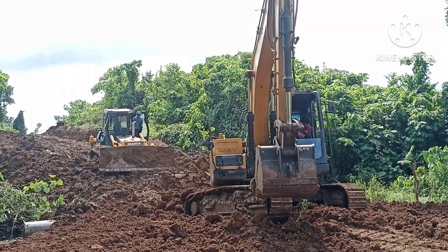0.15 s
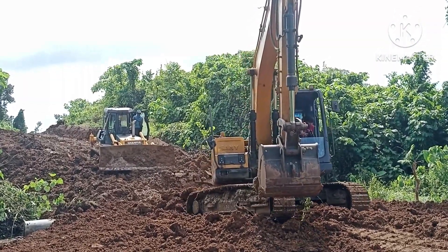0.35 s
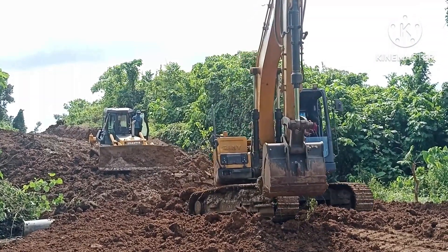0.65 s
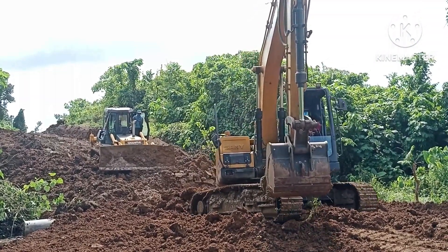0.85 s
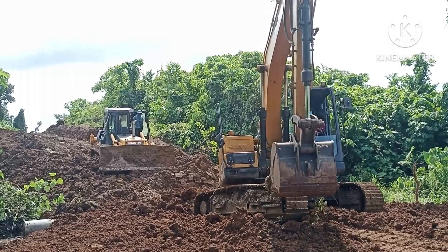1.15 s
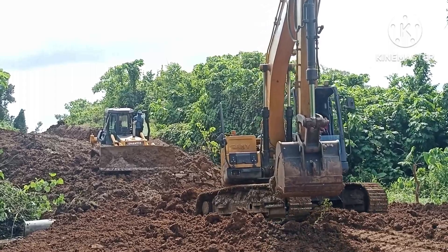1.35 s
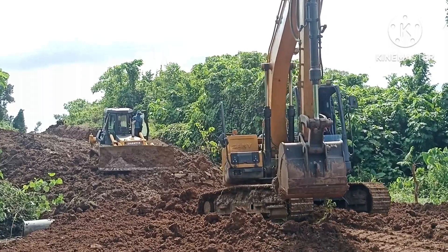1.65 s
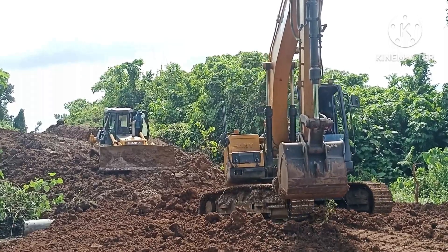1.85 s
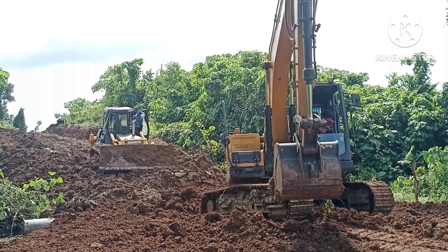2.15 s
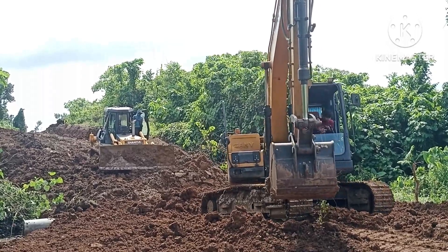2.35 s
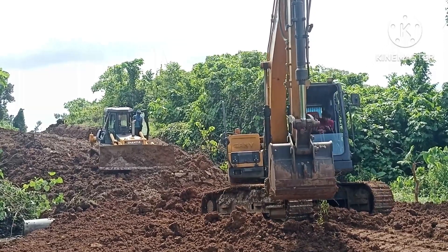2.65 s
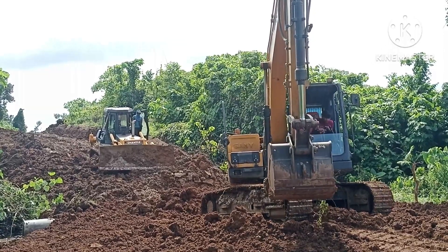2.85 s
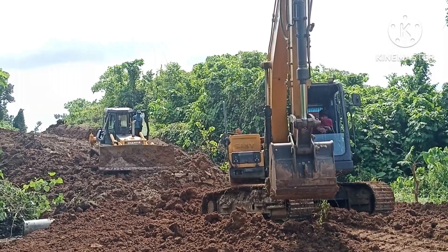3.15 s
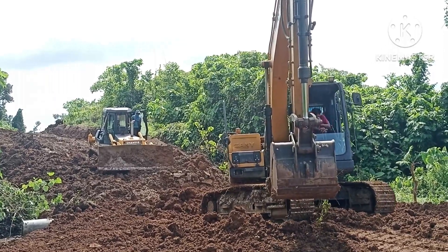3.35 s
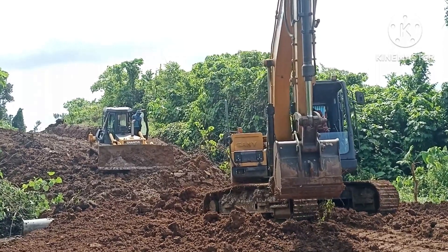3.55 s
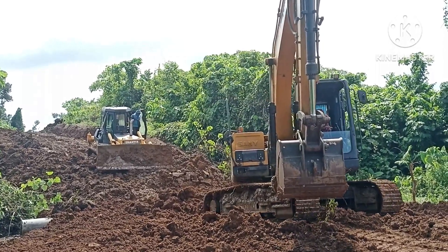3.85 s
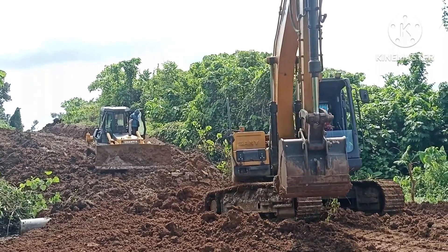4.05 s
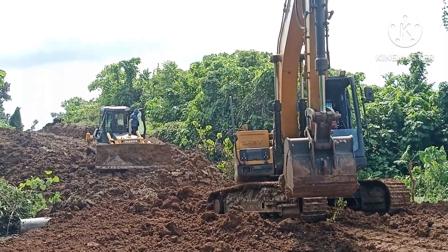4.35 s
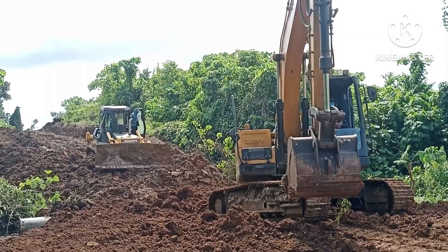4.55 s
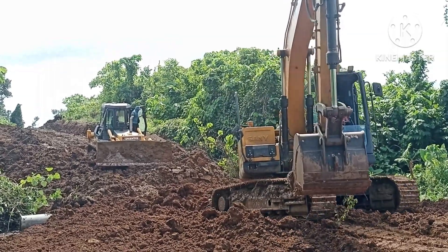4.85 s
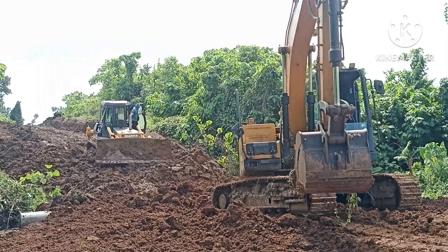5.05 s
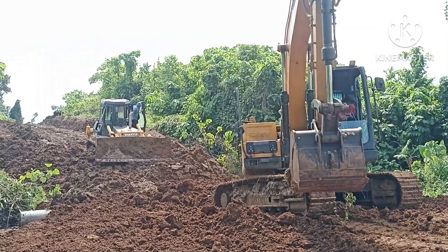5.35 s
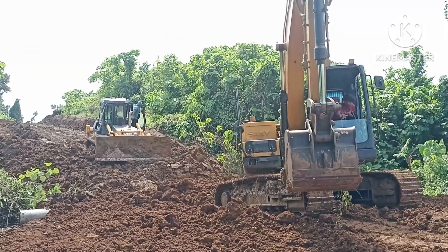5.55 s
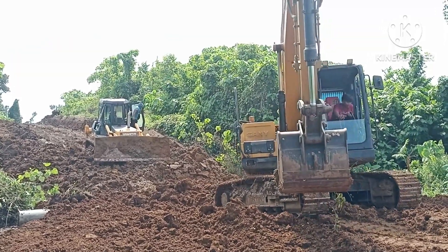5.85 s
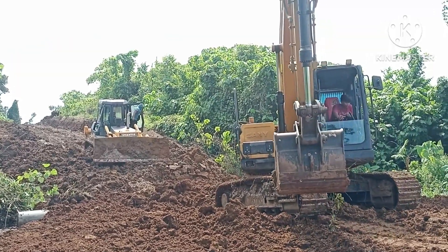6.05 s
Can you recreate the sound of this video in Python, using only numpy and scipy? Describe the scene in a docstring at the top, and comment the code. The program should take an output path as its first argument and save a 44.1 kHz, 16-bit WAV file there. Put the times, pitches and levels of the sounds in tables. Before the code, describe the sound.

Steel excavator tracks clank, slap and rattle in uneven bursts over loose dirt, with brief squeaks and scraping above a low diesel hum outdoors.

```python
"""Open ground with loose dirt: an excavator turns on its steel tracks some way off, trees behind it.
Shoes slap and links clank and rattle: shaped noise bursts with ringing modes; falling tones boom in the frame.
Dry pins squeak, rollers howl and the frame groans on wavering tones; scraping is grit noise with singing modes.
Under it a diesel hums on exhaust lines and travel gears whine; filtered noise gives hydraulic hiss and insects.
Two microphone ports hear it all, with the treble leaning left."""
import sys
import numpy as np
from scipy import signal
from scipy.fft import rfft, irfft, next_fast_len
from scipy.io import wavfile
from scipy.ndimage import uniform_filter1d

SR = 44100
rng = np.random.default_rng(int(sys.argv[2]) if len(sys.argv) > 2 else 0)


def bounce(signal):
    """Save signal as a 16-bit WAV file at the path given by the first command-line argument."""
    frames = np.transpose(np.atleast_2d(signal))
    limited = np.clip(frames, -1, 1)
    pcm = np.round(limited * 32767).astype(np.int16)
    wavfile.write(sys.argv[1], SR, pcm)


N = 272979
TIME = np.arange(N) / SR
SIZE = next_fast_len(N + SR // 2, True)  # padded transform length
FREQ = np.maximum(np.arange(SIZE // 2 + 1) * SR / SIZE, 1)

# Levels in the tables are nominal: each source adds its own gain or random wavering.
# Pins and links knock on the rollers: start_s, struck_pitch_hz, level_db,
# body_relative_db, edge_relative_db, rattling_tail_over_crack_db
CLANKS = [(.008, 1470, -27, -2, -39, -5), (.123, 1365, -20.5, 7.5, -15.5, -5),
          (0.135, 2200, -20, -4, -19, -4.5), (0.179, 1910, -18.5, 9.5, -17.5, -18),
          (0.231, 2026, -12.5, -1, -14.5, -5), (0.338, 1345, -23.5, 0, -34, -8.5),
          (.531, 2040, -19.5, 3, -19, -4), (.542, 1680, -13.5, -17, -13, -10.5),
          (.587, 1760, -23.5, 2.5, -22, -2), (.649, 890, -22, 0.5, -22.5, -1.5),
          (.704, 2320, -26, -35, -17, -6.5), (.926, 2150, -26.5, 4.5, -15.5, 5),
          (.940, 1786, -12, -5.5, -9, -21.5), (.992, 1970, -21.5, 3, -20.5, -2.5),
          (1.055, 1890, -14.5, -3.5, -11.5, -7), (1.066, 1603, -13.5, -13, -13, -10),
          (1.215, 2220, -24.5, -12.5, -25, -0.5), (1.311, 1780, -10.5, -12, -13.5, -10.5),
          (1.327, 1980, -12, -1, -14, -8.5), (1.388, 1520, -22, 5, -20, 1),
          (1.427, 1346, -13.5, 3, -12, -4), (1.438, 2050, -13, -12, -15.5, -2.5),
          (1.487, 1774, -25, 4, -27, -7.5), (1.785, 1490, -34, -18, -33, -3.5),
          (2.025, 1535, -32, -15, -20, -1.5), (2.245, 1600, -27, 0, -15, -12),
          (2.296, 2260, -19, -15, -23, -9), (2.36, 2034, -11, -12, -8, -11),
          (2.385, 2220, -23.5, -6.5, -16.5, 6), (2.414, 1830, -16, 5, -20, -13),
          (2.873, 2234, -21, -16.5, -18, -5.5), (3.978, 1950, -21, -12.5, -17, -9),
          (4.457, 2160, -32, -8.5, -13.5, 0.5), (4.567, 1646, -23.5, 7, -14, -6),
          (4.577, 1410, -18.5, -5, -16.5, -4.5), (4.756, 2150, -16, -29, -16.5, -9),
          (4.953, 1384, -17, -2, -20.5, -1.5), (4.962, 2076, -17, -11.5, -12, -4),
          (5.028, 2020, -18, -3, -22, -8), (5.05, 1400, -23, 0, -16.5, 2),
          (5.203, 1760, -23, -9.5, -21, -5), (5.513, 2010, -10.5, -7, -9, -8),
          (5.547, 2810, -20, -4, -16, -4), (5.785, 1895, -17, -19.5, -24.5, -10),
          (5.81, 1640, -21, -11.5, -16.5, -6), (5.851, 2280, -11, -6, -18, -8),
          (5.949, 530, -33, 3.5, -26, 2), (6.149, 1990, -25, -8.5, -39, -3.5)]
# Ranges of a blow, knock, body, clank, edge: low_hz, high_hz, tail_t60_s, build_up_s, tail_share_db
RANGES = [(185.6, 428, 0.26, 0.011, 1), (441, 1216, 0.21, 0.022, 0), (1210, 2830, 0.33, 0.0057, -1),
          (3120, 8100, 0.32, 0.00057, 0)]
# What the track rings with: pitch_hz, width_hz, relative_db
TRACK_MODES = [(473.3, 8.9, -5.5), (629, 7.3, -5), (785, 9.2, -5.5), (957, 7.5, -3.5), (1213, 10, -10.5),
               (1350, 11.8, -1.5), (1448, 14, -4), (1630, 22, -1), (1733, 22, -5.5), (1994, 25, -1.5),
               (2054, 25, -2.5), (2175, 98, -0.5), (2810, 15, -6), (3165, 16, -3), (3500, 12, -15.5),
               (3850, 25, 0)]
# Colour of the steel: frequency_hz, gain_db
STEEL_COLOUR = [(150, -7.5), (500, -7), (800, 1), (1100, -8.5), (1450, -8), (2100, -6.5), (2600, -12),
                (3300, 0.5), (3900, -1.5), (4600, -9.5), (5550, 3.5), (7000, -5), (7550, -1.5),
                (9000, -23.5), (15000, 15.5)]
# A shoe tips over the idler and slaps down: start_s, level_db, body_relative_db, upper_ring_relative_db
SLAPS = [(.092, -27.5, -4.5, -4), (.506, -25.5, 1.5, -23), (.906, -20, -5, -15), (1.29, -24.5, 2.5, -17),
         (4.555, -28.5, 5, -5.5), (4.946, -29, 5.5, -3.5)]
KNOCK_DB = -8  # knock relative to the body
SLAP_EDGE_DB, SLAP_TAIL_DB = -19, 3.5  # edge over clank, tail over crack
# A slapped shoe rings on: pitch_hz, relative_db, t60_s
SHOE_MODES = [(761, 3.5, 0.068), (1366, -3, 0.32), (1462, -3, .26), (3914, -14.5, 0.25)]
# A shoe beds into the dirt as weight settles on it: centre_s, pitch_hz, level_db
THUDS = [(0.183, 121, -32), (0.599, 104.7, -30), (1.015, 102.6, -41.5), (1.378, 111.7, -29.5),
         (2.396, 116.4, -29.5), (2.423, 190, -32), (2.47, 204, -41), (4.04, 150.7, -41.5),
         (5.612, 146.2, -37)]
THUD_LENGTH_S = 0.026
# Heavy blows boom through the frame: start_s, level_db, starting_pitch_hz, length_s
BOOMS = [(0.117, -36, 400, 0.066), (0.231, -36, 255.6, 0.12), (0.536, -34, 425, 0.18),
         (0.675, -35.5, 474, 0.095), (0.923, -35, 373, 0.2), (1.06, -39.5, 478.5, 0.05),
         (1.321, -35, 381.6, 0.19), (1.434, -31, 343.4, 0.078), (1.524, -46, 402, 0.065),
         (2.372, -39, 215, 0.055), (2.41, -33, 256.5, 0.023), (2.445, -38.5, 300, 0.06),
         (4.195, -40, 482.5, 0.066), (4.572, -30, 710, 0.049), (4.987, -50.5, 473.6, 0.26),
         (5.204, -42.5, 514, 0.046), (5.543, -37, 386, 0.11), (5.885, -43, 602, 0.052)]
BOOM_OCTAVE_S = .036  # nominal time to fall the first octave, scaled for each path
BOOM_LOW_CUT_HZ = 105  # the booms carry little below this
# The frame groans as the track drags sideways: centre_s, pitch_at_centre_hz, level_db, length_s
GROANS = [(1.591, 202, -42, .03), (1.695, 299.4, -48, 0.048), (1.807, 258, -47.5, .03),
          (3.375, 333.4, -50, 0.086), (3.687, 263.6, -55, 0.042), (3.6, 182.2, -54.5, 0.074),
          (4.06, 165.4, -43.5, .06), (4.256, 299, -44.5, 0.047), (4.535, 278.6, -37.5, 0.027),
          (4.812, 227.4, -49.5, 0.11), (5.43, 504, -52, 0.085), (5.987, 604, -46, 0.085),
          (6.073, 238, -48, 0.084)]
GROAN_FALL_OCTAVES_PER_S = 1.8
# A binding roller howls: centre_s, level_db, length_s
HOWLS = [(4.655, -42.5, 0.11), (5.087, -40, 0.11), (5.481, -47.5, 0.038)]
# Tones in every howl: pitch_hz, relative_db
HOWL_TONES = [(180, -2.5), (476, 5), (554, -5), (628, -23), (784, -32), (958, -30), (1213, -12.5),
              (1359, -11), (1428, -13)]
# Dry pins squeak as the links fold: centre_s, pitch_hz, level_db, length_s
SQUEAKS = [(0.107, 2140, -30, 0.011), (0.516, 2625, -38, 0.0099), (0.662, 957, -35, 0.021),
           (0.71, 2276, -33, 0.007), (0.704, 2750, -36, .006), (0.707, 6170, -28.5, 0.0051),
           (0.894, 1370, -49.5, .022), (0.912, 788, -32.5, 0.015), (0.947, 2830, -38, 0.044),
           (1.039, 7480, -36.5, 0.0085), (1.06, 5420, -31.5, .012), (1.674, 2894, -32, 0.0045),
           (1.76, 1740, -42.5, 0.018), (1.794, 711, -47.5, 0.035), (2.239, 494, -46.5, 0.02),
           (2.249, 1538, -34.5, 0.0076), (2.249, 2930, -43, .009), (2.306, 2313, -37, 0.016),
           (2.343, 2214, -33, 0.02), (3.441, 2360, -49.5, 0.046), (4.468, 766, -43.5, 0.02),
           (4.474, 2140, -37, 0.011), (4.48, 2780, -46, 0.027), (4.814, 782, -49, 0.083),
           (4.993, 780.4, -28.5, 0.025), (5.205, 3180, -36, 0.0041), (5.204, 1786, -38, 0.011)]
# Links scrape over rollers and dirt: time_s, level_db
SCRAPE_LEVEL = [(0.0, -42), (0.21, -34.5), (0.31, -30.5), (0.77, -76), (0.96, -39.5), (1.14, -49),
                (1.41, -36), (1.62, -37.5), (1.79, -46.5), (2.07, -54), (2.35, -37), (2.42, -28),
                (2.58, -50), (3.28, -53.5), (3.46, -44.5), (3.75, -50), (4.0, -55.5), (4.15, -40),
                (4.31, -48), (4.52, -59), (4.9, -40), (5.05, -41.5), (5.17, -41), (5.33, -47.5),
                (5.47, -34), (5.7, -44.5), (5.82, -35.5), (6.0, -45.5), (6.19, -62)]
# Colour of the scraping: frequency_hz, density_db_per_hz
SCRAPE_COLOUR = [(200, -3), (330, -5.5), (480, -21.5), (650, 5.5), (800, 1.5), (1100, -4), (1450, 10.5),
                 (2200, 5.5), (2700, 3.5), (3500, 2.5), (4000, -13), (4500, -20.5), (8000, -24.5),
                 (10000, -60)]
# Diesel hum: time_s, level_db
ENGINE_LEVEL = [(0.0, -43.5), (0.26, -35), (0.31, -45), (0.6, -42.5), (0.83, -49), (1.07, -36.5),
                (1.19, -46.5), (1.5, -34), (1.6, -63), (1.67, -44), (2.53, -44), (3.15, -47.5), (3.24, -62),
                (3.62, -46), (3.67, -52.5), (3.88, -56), (3.93, -44), (4.57, -49), (4.64, -45.5),
                (4.96, -56.5), (5.07, -49.5), (5.16, -52.5), (5.74, -44), (6.19, -65)]
# Engine speed: time_s, firing_rate_hz
FIRING = [(0, 87.2), (3.0, 86.9), (3.24, 82.8), (3.43, 82.8), (3.6, 88.3), (3.9, 86.8), (5.05, 87.5),
          (5.3, 85.4), (5.65, 86.9), (6.19, 86.9)]
# Exhaust lines: multiple_of_firing_rate, relative_db
EXHAUST = [(.5, -16.5), (1, 2.5), (1.499, -20), (2.02, -10), (2.25, -15)]
# Low rumble of fan and drive: frequency_hz, relative_db
RUMBLE_COLOUR = [(20, -6), (42, -7.5), (60, -0.5), (120, 12.5), (200, 0), (320, -1), (500, -12), (900, -9),
                 (1500, -26), (4000, -54)]
# Gears of the travel drive: pitch_hz, relative_db
GEAR_TONES = [(782, -10.5), (958, -10.5), (1400, -2), (1646, 0), (1748, -7), (1972, -1.5), (2143, 0.5),
              (2225, -0.5), (2390, -4), (3100, -8), (3300, -12)]
# Thin hydraulic hisses: centre_s, level_db, length_s
HISSES = [(1.63, -43, 0.083), (1.995, -47, 0.018), (2.844, -33.5, 0.025), (2.892, -39.5, 0.034),
          (3.014, -43.5, 0.098), (3.486, -47, 0.16), (5.112, -45, 0.059)]
# Colour of the hiss: frequency_hz, relative_db
HISS_COLOUR = [(2000, -44), (6000, 28), (9000, -9), (13000, -5), (14000, 21), (15200, 8), (16000, 25.5)]
# Colour of the insects: frequency_hz, relative_db
INSECT_COLOUR = [(3500, -46.5), (4800, -21.5), (5700, 5), (6400, 5.5), (7500, -1), (8200, -21),
                 (9000, -102), (11000, -32.5), (12500, -22.5), (15500, -56)]
# The two microphone ports: frequency_hz, left_minus_right_db, diffuse_share_db
PORTS = [(40, 0, -13), (100, -.4, -23), (300, .5, -15), (700, .7, -15), (1300, 4.8, -10), (2400, 5.6, -6),
         (5000, 3.2, -7), (8000, 2, -8), (14000, 10, -7)]
PORT_LAG_S = .00006  # the left port hears later
TOP_HZ = 15700  # upper edge of the microphone's band


def undb(db):
    """Decibels to gain."""
    return 10 ** (np.asarray(db) / 20)


def unit(x):
    """Scale to rms 1."""
    return x / np.sqrt(np.mean(x ** 2))


def noise():
    """Two unrelated noises: the direct sound and its diffuse part."""
    return rng.standard_normal((2, N))


def walk(rate):
    """Smooth random curve that changes about rate times a second; spread near 1."""
    k = max(int(SR / rate), 1)
    steps = np.repeat(rng.standard_normal(N // k + 1), k)
    return 1.3 * uniform_filter1d(steps, k)[:N]


def table_curve(table):
    """A (time, value) table drawn out over the whole scene."""
    return np.interp(TIME, *np.transpose(table))


def swell(s, length):
    """A bell-shaped rise and fall around time s."""
    return np.exp(-2 * np.minimum(((TIME - s) / length) ** 2, 20))


def colour(x, points, modes=()):
    """Causal filter through (Hz, dB) points, with ringing modes on top."""
    hz, db = np.transpose(points)
    gain = undb(np.interp(np.log(FREQ), np.log(hz), db))
    # folding the cepstrum forward in time gives minimum phase
    cepstrum = irfft(np.log(gain), SIZE)
    cepstrum[1:SIZE // 2] *= 2
    cepstrum[SIZE // 2 + 1:] = 0
    ring = 1 + sum(undb(d) / (1 + 1j * (FREQ ** 2 - f ** 2) / (FREQ * w)) for f, w, d in modes)
    return irfft(rfft(x, SIZE) * np.exp(rfft(cepstrum)) * ring, SIZE)[:, :N]


def blows():
    """Every blow on the track as (s, pitch Hz, knock dB, body dB, clank dB, edge dB, tail dB)."""
    shoe_hz = SHOE_MODES[0][0]
    hits = [(s, shoe_hz, db, body, SLAP_EDGE_DB, SLAP_TAIL_DB) for s, db, body, _ in SLAPS] + CLANKS
    return [(s, hz, db + body + KNOCK_DB, db + body, db, db + edge, tail)
            for s, hz, db, body, edge, tail in hits]


def clanks(hits, hard_db=-23, crack_s=0.0044, patchy_db=2.0, soft_s=0.0033, soft_db=8,
           gain_db=-2.5, count=4):
    """A blow is a short crack, then a tail as neighbouring shoes rattle; each range builds up at its own pace."""
    t = np.arange(SR // 2) / SR
    chatter = unit(noise() * undb(2.2 * walk(260)))
    out = 0
    for k, (low_hz, high_hz, t60, rise, share_db) in enumerate(RANGES):
        power = np.zeros(N + SR)
        crack = np.exp(-2 * t / crack_s)
        tail = undb(share_db - 60 * t / t60) ** 2
        for s, _, *range_db, tail_db in hits:
            # a light blow lands more slowly than a hard one
            landing = soft_s * (max(hard_db - range_db[2], 0) / soft_db) ** 2
            onset = (1 - np.exp(-t / (rise + landing))) ** 2
            i = max(int(s * SR), 0)
            power[i:i + len(t)] += undb(range_db[k]) ** 2 * onset * (crack + undb(tail_db) ** 2 * tail)
        # a different stretch of chatter for each range, raised to make up for its narrow band
        force = np.roll(chatter, k * SR, axis=1) * np.sqrt(power[:N] * SR / 2 / (high_hz - low_hz))
        # the contact shifts along the shoe, so narrow parts of each range flare up in turn
        edges = np.geomspace(low_hz, high_hz, count + 1)
        for n, pair in enumerate(zip(edges, edges[1:])):
            band = signal.butter(2, pair, "band", fs=SR, output="sos")
            flare = unit(undb(patchy_db * walk(55)))
            out = out + (-1) ** n * signal.sosfilt(band, force) * flare
    return undb(gain_db) * colour(out, STEEL_COLOUR, TRACK_MODES)


def rings(hits, ping_db=-1, ping_t60=0.034, partner_db=-6, ring_db=-21, ring_t60=0.21,
          uneven_db=4, count=5):
    """Each blow sets the struck part pinging and wakes the modes of the track, each time in other shares."""
    t = np.arange(SR // 2) / SR
    short = t[:SR // 6]
    centres = np.log([np.sqrt(low * high) for low, high, *_ in RANGES])
    mode_hz, _, mode_db = np.transpose(TRACK_MODES)
    mode_fade = undb(mode_db[:, None] + ring_db - 60 * t / ring_t60)
    modes = np.exp(2j * np.pi * mode_hz[:, None] * t) * mode_fade
    touch = 1 - np.exp(-t / 0.003)
    out = np.zeros((2, N + SR))
    for s, hz, *range_db, _ in hits:
        uneven = uneven_db * np.clip(rng.standard_normal(len(mode_hz)), -2, 1.5)
        shares = undb(np.interp(np.log(mode_hz), centres, range_db) + uneven)
        phases = np.exp(2j * np.pi * rng.random((2, len(mode_hz))))
        ring = ((shares * phases) @ modes).real
        # the struck part: one leading partial and weaker partners around it, soon damped by the dirt
        partial_hz = hz * 2 ** np.append(0, rng.uniform(-0.478, 0.384, count))
        partner_drop = partner_db * (np.arange(count + 1) > 0)
        partial_db = np.interp(np.log(hz), centres, range_db) + ping_db + partner_drop
        partials = np.exp(2j * np.pi * partial_hz[:, None] * short) * undb(-60 * short / ping_t60)
        phases = np.exp(2j * np.pi * rng.random((2, count + 1)))
        ring[:, :len(short)] += ((undb(partial_db) * phases) @ partials).real
        i = max(int(s * SR), 0)
        out[:, i:i + len(t)] += touch * ring
    return out[:, :N]


def rattles(hits, gain_db=-10, delay_s=.045, fall_db_per_s=130, scatter_db=4, t60=0.0094,
            low_hz=1200, high_hz=3600, tilt_db=-3, count=16):
    """Loose links and grit bounce on the steel: a thinning shower of tiny pings, the higher ones weaker."""
    t = np.arange(SR // 25) / SR
    fade = (1 - np.exp(-t / 0.0012)) * undb(-60 * t / t60)
    out = np.zeros((2, N + SR))
    for s, _, _, _, clank_db, _, _ in hits:
        for wait, place, size, *phases in rng.random((count, 5)):
            delay = -delay_s * np.log(1 - wait)
            hz = low_hz * (high_hz / low_hz) ** place
            db = clank_db + gain_db - fall_db_per_s * delay
            db += tilt_db * np.log2(hz / low_hz) + scatter_db * (2 * size - 1)
            i = int(np.clip(s + delay, 0, N / SR) * SR)
            ping = np.sin(2 * np.pi * (hz * t + np.array(phases)[:, None]))
            out[:, i:i + len(t)] += undb(db) * fade * ping
    return out[:, :N]


def shoes(rise_s=0.0086):
    """A slapped shoe rings on one low tone; where the dirt leaves it free, its upper tones ring on too."""
    t = np.arange(SR // 2) / SR
    out = np.zeros((2, N + SR))
    for s, db, body_db, upper_db in SLAPS:
        i = int(s * SR)
        for k, (hz, mode_db, t60) in enumerate(SHOE_MODES):
            level_db = db + body_db + mode_db + upper_db * (k > 0)
            fade = (1 - np.exp(-t / rise_s)) * undb(level_db - 60 * t / t60)
            out[:, i:i + len(t)] += fade * np.sin(2 * np.pi * (hz * t + rng.random((2, 1))))
    return out[:, :N]


def bend(hz, sway, overtone=2.1, overtone_db=-16):
    """A bending wave of the frame on a pitch curve, with one overtone."""
    turns = np.cumsum(hz) / SR + sway + rng.random((2, 1))
    upper = undb(overtone_db) * np.sin(2 * np.pi * overtone * turns)
    return np.sqrt(2) * (np.sin(2 * np.pi * turns) + upper)


def thuds(rough=0.44, wobble=0.093):
    """A shoe beds into the dirt: one short, low tone that swells and fades."""
    out = np.zeros((2, N))
    flutter, sway = 1 + rough * walk(60), wobble * walk(60)
    for s, hz, db in THUDS:
        near = np.abs(TIME - s) < 2 * THUD_LENGTH_S
        shape = (swell(s, THUD_LENGTH_S) * flutter)[near]
        out[:, near] += undb(db) * shape * bend(np.full(near.sum(), hz), sway[near])
    return out


def booms(gain_db=1, rough=0.91, wobble=0.27, fullness=0.43, spread=0.3054, count=2):
    """Bending waves take two paths through the frame; high ones arrive first, so each boom falls in pitch."""
    out = np.zeros((2, N))
    for path in 2 ** (spread * np.linspace(-1, 1, count)):
        flutter, sway = unit(1 + rough * walk(90)), wobble * walk(80)
        for s, db, hz, length in BOOMS:
            near = np.arange(int(s * SR), min(int((s + length) * SR), N))
            t = (near - near[0]) / SR
            arch = np.abs(np.sin(np.pi * t / length)) ** fullness
            pitch = hz / (1 + t / (BOOM_OCTAVE_S * path))
            out[:, near] += undb(db) * arch * flutter[near] * bend(pitch, sway[near])
    low_cut = signal.butter(4, BOOM_LOW_CUT_HZ, "high", fs=SR, output="sos")
    return undb(gain_db) * signal.sosfilt(low_cut, out) / np.sqrt(count)


def groans(rough=0.29, wobble=0.14):
    """The dragged frame groans: rough, slowly sinking tones that swell and fade."""
    out = np.zeros((2, N))
    flutter, sway = 1 + rough * walk(160), wobble * walk(150)
    for s, hz, db, length in GROANS:
        near = np.abs(TIME - s) < 2 * length
        pitch = hz * 2 ** (-GROAN_FALL_OCTAVES_PER_S * (TIME[near] - s))
        shape = (swell(s, length) * flutter)[near]
        out[:, near] += undb(db) * shape * bend(pitch, sway[near])
    return out


def howls(rough=0.54, wobble=0.11):
    """A roller binds and sings on a few unsteady tones around held pitches."""
    tones = 0
    for hz, db in HOWL_TONES:
        flutter = 1 + rough * walk(60)
        turns = hz * TIME + wobble * walk(60) + rng.random((2, 1))
        tones = tones + undb(db) * flutter * np.sin(2 * np.pi * turns)
    return np.sqrt(2) * tones * sum(undb(db) * swell(s, length) for s, db, length in HOWLS)


def squeaks(wobble=0.08, rough=0.24, width=0.011):
    """A dry pin sticks and slips for a moment: one unsteady tone that swells and dies."""
    out = np.zeros((2, N))
    flutter, sway, drift = 1 + rough * walk(220), wobble * walk(200), width * walk(150)
    for s, hz, db, length in SQUEAKS:
        near = np.abs(TIME - s) < 2.5 * length
        turns = np.cumsum(hz * (1 + drift[near])) / SR + sway[near] + rng.random((2, 1))
        shape = (swell(s, length) * flutter)[near]
        out[:, near] += undb(db) * shape * np.sqrt(2) * np.sin(2 * np.pi * turns)
    return out


def scrape(gain_db=-8, sing_db=-1, waver_db=6):
    """Links grind over the rollers: dense uneven grit, while the modes of the steel sing in and out."""
    surge_db = 4 * walk(22)
    grit = noise() * undb(2.5 * walk(330) + surge_db)
    sing = 0
    for hz, width, db in TRACK_MODES:
        turns = np.cumsum(hz + width * walk(110)) / SR
        colour_db = np.interp(hz, *np.transpose(SCRAPE_COLOUR))
        strength = undb(db + colour_db + waver_db * walk(22))
        sing = sing + strength * np.sin(2 * np.pi * (turns + rng.random((2, 1))))
    grind = unit(colour(grit, SCRAPE_COLOUR, TRACK_MODES)) + undb(sing_db) * unit(sing)
    return unit(grind) * undb(table_curve(SCRAPE_LEVEL) + gain_db)


def diesel(hum_db=-1, rumble_db=-42, rumble_follow=0.34, drift=0.0125):
    """Exhaust lines follow a firing rate that sags and drifts; they gurgle over the rumble of fan and drive."""
    turns = np.cumsum(table_curve(FIRING) * (1 + drift * walk(12))) / SR
    gurgle = 1 + .33 * walk(45)
    lines = 0
    for multiple, db in EXHAUST:
        strength = undb(db + 2.94 * walk(18))
        lines = lines + strength * np.sin(2 * np.pi * (multiple * turns + rng.random()))
    load_db = table_curve(ENGINE_LEVEL)
    rumble_level_db = rumble_db + rumble_follow * load_db + 1.5 * walk(18)
    rumble = unit(colour(noise(), RUMBLE_COLOUR)) * undb(rumble_level_db)
    return unit(gurgle * lines) * undb(load_db + hum_db) + rumble


def gears(level_db=-60.5, waver_db=5, follow=0.62):
    """Travel gears whine: tones drift together, waver and flutter singly, and swell with the scraping."""
    speed = 1 + .014 * walk(9)
    whine = 0
    for hz, db in GEAR_TONES:
        turns = np.cumsum(hz * (speed + .007 * walk(50))) / SR
        flutter = 1 + .5 * walk(110)
        strength = undb(db + waver_db * walk(13)) * flutter
        whine = whine + strength * np.sin(2 * np.pi * (turns + rng.random((2, 1))))
    drag_db = table_curve(SCRAPE_LEVEL)
    return unit(whine) * undb(level_db + follow * (drag_db - drag_db.mean()))


def hydraulics():
    """Oil squeezes through a valve in short, very high hisses."""
    flow = sum(undb(db) * swell(s, length) for s, db, length in HISSES)
    return unit(colour(noise(), HISS_COLOUR)) * flow


def insects(level_db=-59):
    """A far chorus in the trees: a high noise band with a fine flutter."""
    flutter_db = walk(3) + 1.4 * walk(120)
    return unit(colour(noise(), INSECT_COLOUR)) * undb(level_db + flutter_db)


def scene():
    """All sources reach two ports; the left one hears the treble louder and everything slightly later."""
    hits = blows()
    track = clanks(hits) + rings(hits) + rattles(hits) + shoes() + thuds()
    frame = booms() + groans()
    friction = howls() + squeaks() + scrape()
    drive = diesel() + gears() + hydraulics()
    direct, diffuse = rfft(track + frame + friction + drive + insects(), SIZE)
    hz, *columns = np.transpose(PORTS)
    pan_db, share_db = (np.interp(np.log(FREQ), np.log(hz), c) for c in columns)
    pan, share = undb(pan_db), undb(np.minimum(share_db, -2))
    # the diffuse part enters the ports with opposite signs
    left = (direct + share * diffuse) * pan * np.exp(-2j * np.pi * FREQ * PORT_LAG_S)
    right = direct - share * diffuse
    balance = np.sqrt(2 / (1 + pan ** 2) / (1 + share ** 2))  # keeps the summed power
    return irfft(np.array([left, right]) * balance, SIZE)[:, :N]


def record(dry):
    """The microphone's band ends in a steep cut of the top treble."""
    return signal.sosfilt(signal.ellip(8, .2, 70, TOP_HZ, fs=SR, output="sos"), dry)


dry = scene()
out = record(dry)
bounce(out)
```